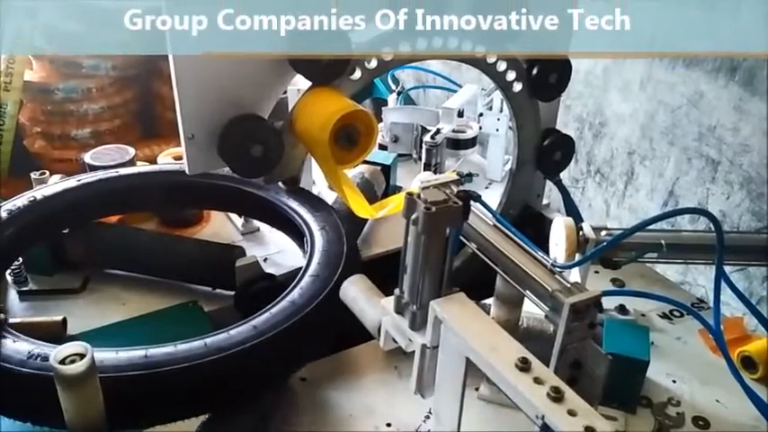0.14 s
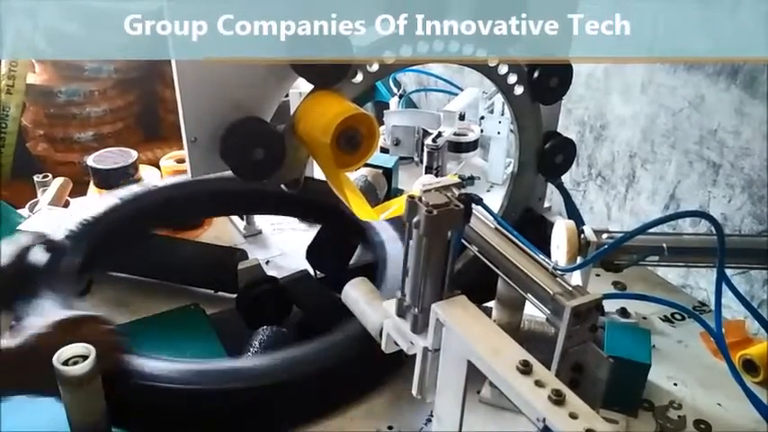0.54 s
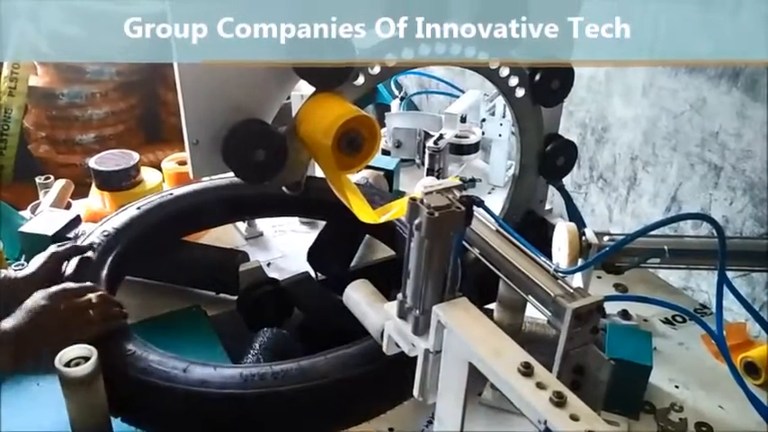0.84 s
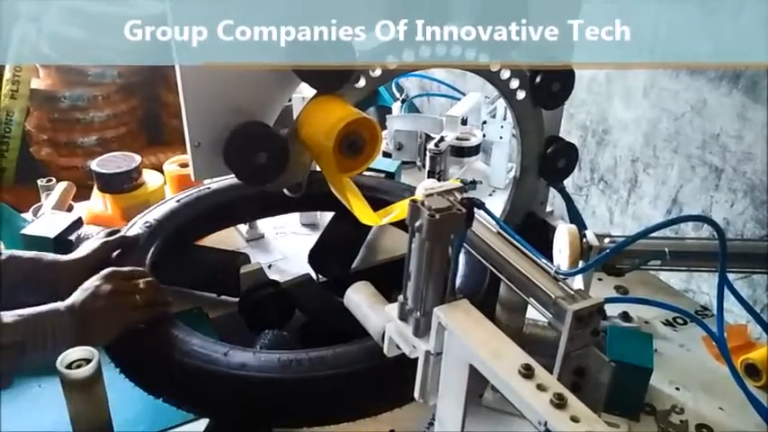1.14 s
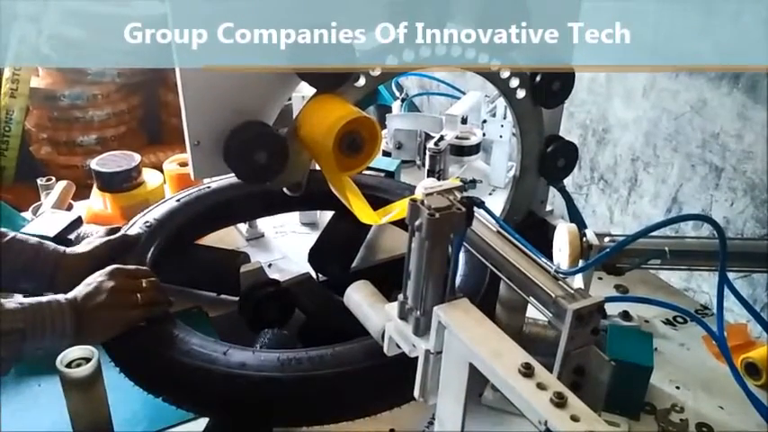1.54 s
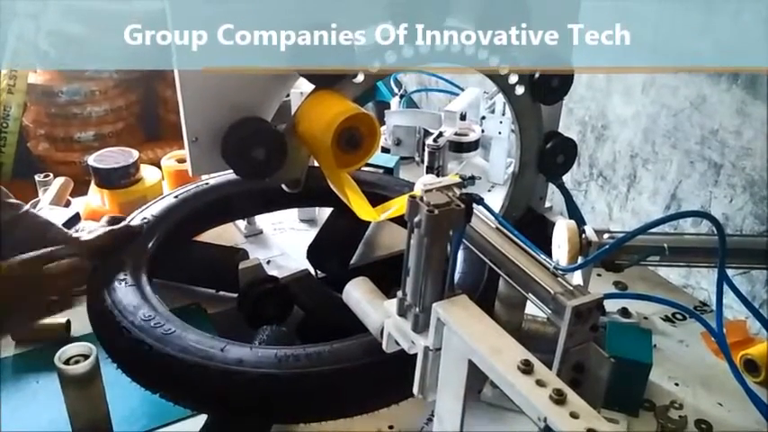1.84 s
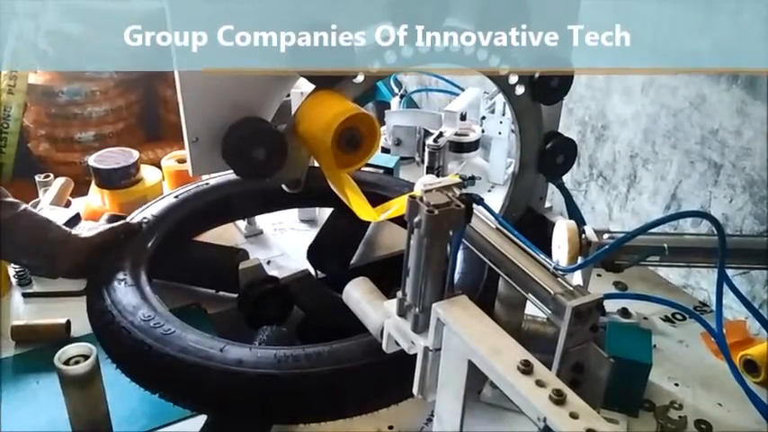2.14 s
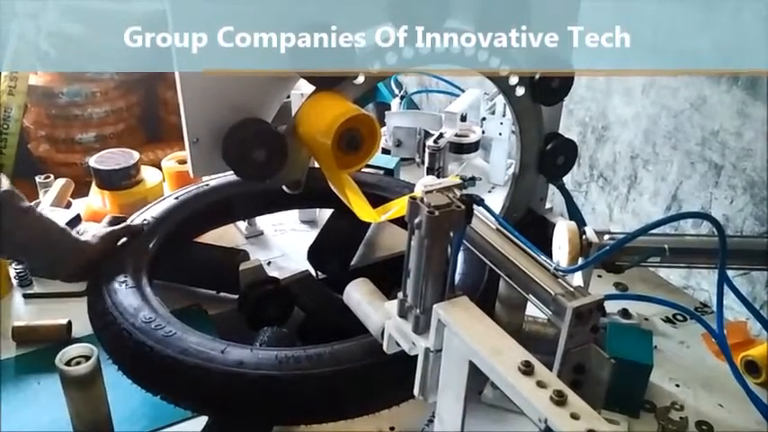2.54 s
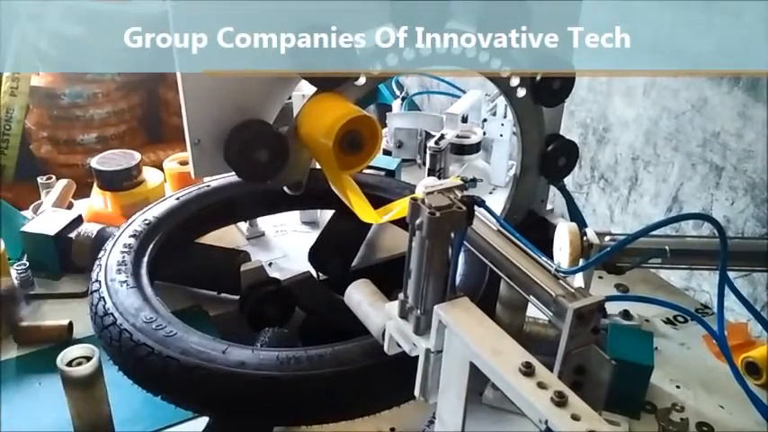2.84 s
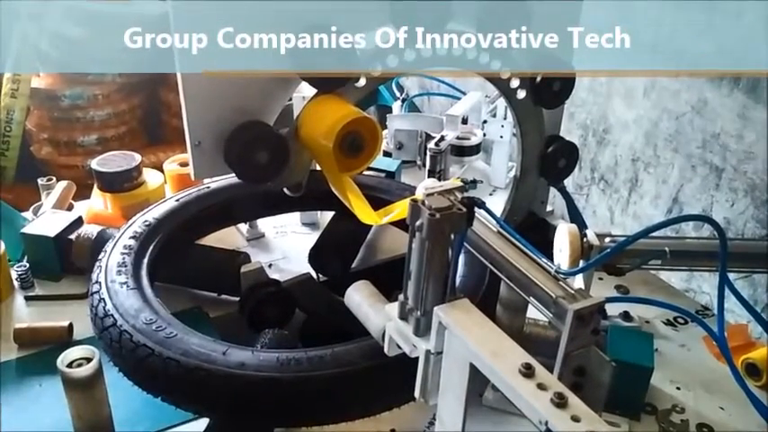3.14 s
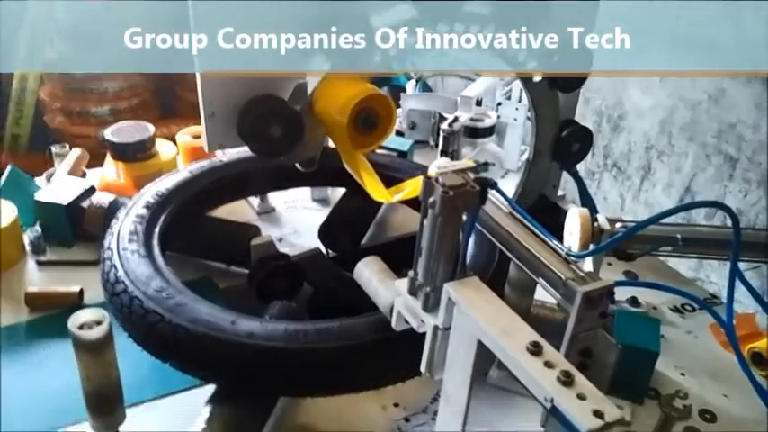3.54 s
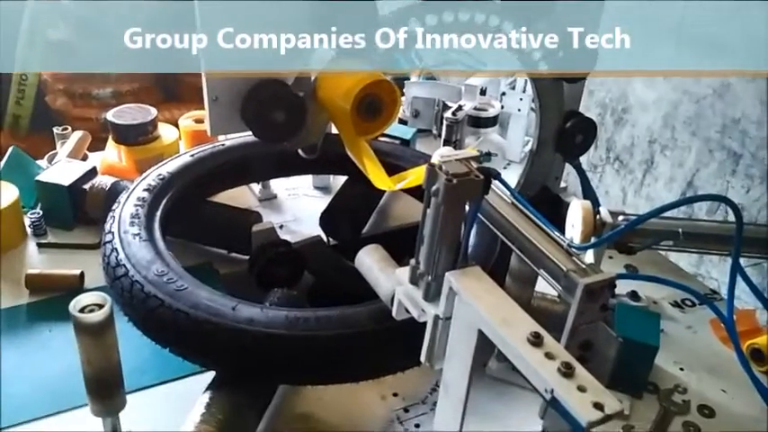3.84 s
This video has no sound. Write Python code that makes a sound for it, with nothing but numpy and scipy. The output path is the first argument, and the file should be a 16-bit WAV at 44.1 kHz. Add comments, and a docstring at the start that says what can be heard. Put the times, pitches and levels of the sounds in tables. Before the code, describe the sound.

Pneumatic clamp vents sharply twice near the end, the second spitting as it opens; before that a tyre slides, groans and knocks with plastic film crackling, machine idling, miked close in a small live workshop.

```python
"""Tyre wrapping in a workshop

A tyre is pushed into a wrapping machine, over the low rumble of the idling drive.
Rubber scuffs, groans and squeaks (shaped noise, unsteady tones); film rustles and ticks (noise strokes).
The pneumatic clamp vents in two short loud hisses of shaped noise, the second with spits at its opening.
"""
import sys
import numpy as np
from scipy import signal
from scipy.fft import rfft, irfft
from scipy.io import wavfile

SR = 44100
rng = np.random.default_rng(int(sys.argv[2]) if len(sys.argv) > 2 else 0)


def dump(signal):
    """Clip the signal to [-1, 1] and save it as 16-bit WAV at the path in sys.argv[1]."""
    limited = np.clip(np.atleast_2d(signal).T, -1, 1)
    pcm = np.round(limited * 32767).astype(np.int16)
    wavfile.write(sys.argv[1], SR, pcm)


N = 176400
T = np.arange(N) / SR
HZ = np.fft.rfftfreq(2 * N, 1 / SR)  # frequencies of a signal padded to double length
SHORT_HZ = HZ[::2]  # frequencies of an unpadded signal
JITTER_HZ = 414  # how fast the pitch of whistles and squeaks wavers

# colours of the two exhaust ports, named in the table of bursts: f/Hz, relative level per Hz/dB
FIRST_PORT = [(40, -43), (400, -19), (530, -24.5), (860, -18.5), (1120, -10.5), (1300, -17.5), (1700, -13),
              (2400, -8.5), (3100, -13), (4400, -15), (5500, -9.5), (6900, -10), (8600, -0.5), (10200, -9),
              (14200, -5.5)]
SECOND_PORT = [(40, -30), (115, -18), (290, -25), (410, -11.5), (640, -31.5), (920, -12.5), (1800, -8.5),
               (2300, -6.5), (2850, -4.5), (3700, -7.5), (4800, -6.5), (5600, -3.5), (7000, -4.5),
               (8500, 2.5), (10200, -4.5), (14200, -0.5)]
# colour of the plastic film: f/Hz, relative level per Hz/dB
FILM = [(500, -53), (2500, -19), (4000, -17), (5300, -10.5), (6500, -9.5), (8100, 2.5), (9000, 0),
        (10200, -6), (13500, -3.5), (15000, -15)]


def amp(db):
    """Turns decibels into a gain."""
    return 10 ** (np.asarray(db) / 20)


def unit(x):
    """Scales to an rms of one."""
    return x / np.sqrt(np.mean(x ** 2) + 1e-20)


def read(points, hz):
    """Reads a table along a log-frequency axis."""
    f, value = np.transpose(points)
    return np.interp(np.log(hz + 1), np.log(f), value)


def low_pass(x, hz):
    """Fades out what lies above hz, without delay."""
    return irfft(rfft(x) / (1 + (SHORT_HZ / hz) ** 4), N)


def wobble(hz):
    """Random up-and-down of rms one, moving mostly slower than hz."""
    return unit(low_pass(rng.standard_normal(N), hz))


def colour(x, points):
    """Gives white noise the spectrum of a table, at unchanged power and with no sound ahead of its cause."""
    log_gain = np.log(unit(amp(read(points, HZ))))
    mirrored = np.r_[log_gain, log_gain[-2:0:-1]]
    phase = -signal.hilbert(mirrored).imag[:N + 1]  # minimum phase
    return irfft(rfft(x, 2 * N) * np.exp(log_gain + 1j * phase))[..., :N]


def pair(x):
    """Makes two unrelated channels alike in the bass, as at two close microphones."""
    # left-right likeness: f/Hz, correlation from 0 to 1
    likeness = [(100, .95), (350, .93), (700, .62), (1200, .35), (8000, 0)]
    a, b = rfft(x, 2 * N)
    same = read(likeness, HZ)
    return irfft(np.array([a, same * a + np.sqrt(1 - same ** 2) * b]))[:, :N]


def noise():
    """White turbulence as the two microphones hear it."""
    return pair(rng.standard_normal((2, N)))


def decay(start, seconds):
    """Sudden rise, then an exponential fall to 1/e in the given seconds."""
    return (T >= start) * np.exp(-np.maximum(T - start, 0) / seconds)


def sine(hz):
    """Tone that follows a changing pitch."""
    return np.sin(2 * np.pi * np.cumsum(hz) / SR)


def bursts():
    """Escaping air is turbulent: each jet opens, swells and shuts, sputtering while its body settles."""
    # air bursts: start t/s, opening time/s, swell time/s, length/s, full level/dB, extra level at opening/dB,
    # extra level of the body at opening/dB, sputter rms/dB, colour of the port
    burst_table = [(2.733, 0.0095, 0.039, 0.07, -14.5, -10, -12, -0.5, FIRST_PORT),
                   (3.785, .004, 0.057, 0.093, -13.5, -7.5, 3.5, 1.46, SECOND_PORT)]
    body_hz, settle_s = 4300, 0.066  # the body is what lies below body_hz
    lump_db, lump_hz = 2.4, 110
    close_db_per_s, sputter_hz = 420, 262
    out = np.zeros((2, N))
    for start, opening, swell, length, db, first_db, body_db, sputter_db, port in burst_table:
        t = T - start
        level = db + first_db * np.clip(1 - t / swell, 0, 1) ** 1.36
        level -= close_db_per_s * np.maximum(t - length, 0)
        level += sputter_db * wobble(sputter_hz)
        opened = np.clip(t / opening, 0, 1)
        jet = colour(noise() * opened * amp(level), port)
        body = low_pass(jet, body_hz)
        body_change = body_db * np.clip(1 - t / settle_s, 0, 1) + lump_db * wobble(lump_hz)
        out += jet - body + body * amp(body_change)
    return out


def valve_spits():
    """Around the second opening the valve spits: a crack, a short leak and a ring each time."""
    # spits of the valve: t/s, level/dB
    spits = [(3.751, -26), (3.7693, -24.5), (3.784, -19), (3.791, -23)]
    # colour of a spit: f/Hz, relative level per Hz/dB
    spit_colour = [(200, -25), (2000, -16.5), (2850, 0.5), (4000, -12.5), (5500, -1), (8200, 2),
                   (10500, -8), (14000, -4)]
    crack_s, leak_db, leak_s = 0.0031, -9.5, 0.023
    ring_hz, ring_db, ring_s = 2980, -3.5, 0.0022
    puffs, ring = np.zeros(N), np.zeros(N)
    for s, db in spits:
        puffs += amp(db) * (decay(s, crack_s) + amp(leak_db) * decay(s, leak_s))
        ring += amp(db + ring_db) * decay(s, ring_s) * np.sin(2 * np.pi * ring_hz * (T - s))
    return colour(noise() * puffs, spit_colour) + ring


def machine_echoes(x):
    """Close metal parts throw back a dense cluster of very early echoes."""
    first_s, fade_s, echo_db = 0.00072, 0.0074, -9
    taps = rng.standard_normal((2, N)) * decay(first_s, fade_s)
    taps = pair(taps / np.linalg.norm(taps[0])) * amp(echo_db)
    echoes = signal.fftconvolve(x, taps, axes=1)[:, :N]
    return (x + echoes) / np.hypot(1, amp(echo_db))


def off_axis(x):
    """The jet reaches the right microphone a moment before the left."""
    lag_s = 0.00029
    left = irfft(rfft(x[0]) * np.exp(-2j * np.pi * SHORT_HZ * lag_s), N)
    return np.array([left, x[1]])


def whistles():
    """Each jet briefly rings the cavities of its port, giving breathy, wavering tones."""
    # whistles: start t/s, length/s, mean f/Hz, peak level/dB
    whistle_table = [(2.755, 0.063, 868, -38.5), (2.757, 0.064, 2400, -42), (3.859, 0.017, 2795, -25),
                     (3.897, 0.017, 2350, -26.5)]
    jitter = 0.051  # rms share of the pitch
    out = np.zeros(N)
    for start, length, hz, db in whistle_table:
        pitch = hz * (1 + jitter * wobble(JITTER_HZ))
        swell = np.sin(np.pi * np.clip((T - start) / length, 0, 1))
        out += amp(db) * swell * sine(pitch)
    return out


def slide():
    """Rubber grips and slips unevenly, driving the hollow tyre and the table."""
    # the sliding tyre: t/s, level of the low scuffing/dB, level of the dry scraping/dB
    strokes = [(0, -52.5, -50), (.4, -59.5, -79), (.465, -61, -62), (.49, -48, -56), (.58, -51, -58.5),
               (.79, -47, -57), (.98, -48.5, -71), (1.115, -56, -64), (1.138, -49.5, -50.5),
               (1.25, -46.5, -69.5), (1.36, -51, -64.5), (1.48, -47, -56), (1.575, -50, -58.5),
               (1.61, -45.5, -52.5), (1.75, -53.5, -57), (1.99, -46, -55), (2.24, -51.5, -62.5),
               (2.29, -48.5, -55.5), (2.69, -51.5, -54.5), (3.1, -58, -59), (3.62, -62.5, -81),
               (3.71, -53.5, -57.5), (3.76, -57, -57)]
    # colour of the scuffing: f/Hz, relative level per Hz/dB
    scuff_colour = [(40, -25.5), (110, -10.5), (240, 1), (300, -0.5), (370, -1.5), (460, -3.5), (600, -3.5),
                    (700, -7.5), (830, 0.5), (1050, -12), (1600, -16.5), (5000, -48.5)]
    # colour of the scraping: f/Hz, relative level per Hz/dB
    scrape_colour = [(400, -15), (1100, -5), (2700, -1), (3400, -9), (4200, -10.5), (5100, -7), (7000, -10),
                     (14000, -30)]
    s, scuff_db, scrape_db = np.transpose(strokes)
    grip = 1.5 * wobble(47.6)  # dB, shared by both layers
    scuff = noise() * amp(np.interp(T, s, scuff_db) + grip)
    scrape = noise() * amp(np.interp(T, s, scrape_db) + grip)
    return colour(scuff, scuff_colour) + colour(scrape, scrape_colour)


def rubs():
    """Where the rubber slips too fast to lock, it rasps in one narrow band."""
    # rubs of tyre and film: start t/s, rise/s, fall to 1/e/s, centre f/Hz, width/Hz, level/dB
    rub_table = [(.69, .09, 0.11, 2150, 380, -49.5), (1.128, .008, .035, 2630, 520, -50),
                 (1.2, 0.043, 0.066, 2200, 170, -56.5), (1.42, .12, 0.094, 4980, 300, -60),
                 (1.69, 0.072, .03, 3180, 800, -55.5), (1.695, 0.012, 0.077, 11870, 2850, -46.5),
                 (2.47, 0.13, 0.092, 2890, 98, -56.5)]
    grip_db, grip_hz = 3, 70
    out = np.zeros((2, N))
    for start, rise, fall, hz, width, db in rub_table:
        band_gain = 1 / (1 + (2 * (SHORT_HZ - hz) / width) ** 4)
        band = unit(irfft(rfft(noise()) * band_gain, N))
        stroke = np.clip((T - start) / rise, 0, 1) * np.exp(-np.maximum(T - start - rise, 0) / fall)
        out += amp(db) * band * stroke
    return out * amp(grip_db * wobble(grip_hz))


def squeaks():
    """On the rollers, stick-slip of the rubber locks briefly onto one unsteady pitch: a squeak or groan."""
    # squeaks and groans: start t/s, length/s, first f/Hz, last f/Hz, rms pitch jitter/Hz, rms level at peak/dB
    squeak_table = [(0.827, 0.032, 1080, 1167, 56, -49), (1.587, 0.028, 225, 254, 10, -40),
                    (1.612, 0.014, 580, 547, 31, -35), (1.665, 0.12, 2500, 2520, 127, -46),
                    (1.716, 0.133, 2540, 2500, 65, -50), (1.934, 0.075, 840, 709, 43, -47.5),
                    (2.02, 0.094, 332, 332.4, 8.7, -38), (2.127, 0.058, 343, 337, 14, -40.5),
                    (2.373, 0.131, 540, 451, 12, -47.5), (0.48, 0.024, 2600, 2410, 83, -52)]
    flutter_db, flutter_hz = 1.5, 91
    out = np.zeros(N)
    jitter = wobble(JITTER_HZ)
    for start, length, first_hz, last_hz, jitter_hz, db in squeak_table:
        u = np.clip((T - start) / length, 0, 1)
        hz = first_hz + (last_hz - first_hz) * u + jitter_hz * jitter
        swell = np.sin(np.pi * u) ** 1.07
        out += amp(db) * np.sqrt(2) * swell * sine(hz)
    return out * amp(flutter_db * wobble(flutter_hz))


def bumps():
    """The tyre knocks the rollers with a low, quickly damped ring."""
    # soft bumps: t/s, f/Hz, level/dB, fall to 1/e/s
    bump_table = [(0.58, 340, -32.5, 0.0046), (0.71, 100, -46.5, 0.052), (0.92, 240, -43.5, 0.041),
                  (0.84, 175, -44, 0.021), (3.806, 126, -45, 0.02)]
    out = np.zeros(N)
    for s, hz, db, ring_s in bump_table:
        out += amp(db) * decay(s, ring_s) * np.sin(2 * np.pi * hz * (T - s))
    return out


def film():
    """Bending film crackles: each stroke is a fine hiss thick with tiny crinkles."""
    # rustling strokes: peak t/s, rise from 1/e/s, fall to 1/e squared/s, level/dB
    rustles = [(0.0, .01, 0.15, -42.5), (.115, 0.04, 0.14, -36.5), (.385, 0.0073, 0.074, -47.5),
               (.505, 0.059, 0.26, -42.5), (.635, 0.032, 0.29, -36.5), (1.14, 0.01, 0.21, -49.5),
               (1.235, 0.047, 0.11, -46.5), (1.93, 0.074, 0.31, -48.5), (2.05, 0.056, 0.23, -44),
               (2.421, 0.058, 0.8, -50), (2.69, 0.071, 0.46, -43), (3.02, 0.091, 0.63, -49),
               (3.43, .022, 0.29, -44)]
    crinkles_per_s, spread_db, crinkle_share = 3500, 2.3, 0.3  # share of the power
    power = np.zeros(N)
    for s, rise, fall, db in rustles:
        stroke = np.where(T < s, np.exp(-((T - s) / rise) ** 2), decay(s, fall / 2))
        power += (amp(db) * stroke) ** 2
    sizes = amp(spread_db * np.minimum(rng.exponential(1, N), 5))
    crinkles = sizes * (rng.random(N) < crinkles_per_s / SR)
    power *= 1 - crinkle_share + crinkle_share * unit(crinkles) ** 2
    return colour(noise() * np.sqrt(power), FILM)


def ticks():
    """Film snaps brightly over duller knocks of varied strength; pulled taut, it cracks sharply twice."""
    # ticks: t/s, level/dB, fall to 1/e/s, level of the low knock/dB
    tick_table = [(.073, -30.5, 0.0081, -62), (.777, -31.5, 0.0021, -32.5), (0.817, -33.5, 0.004, -42),
                  (3.2468, -30, 0.0018, -44), (3.405, -35, 0.005, -43.5), (3.468, -31, 0.0047, -47.5)]
    # colour of the knock: f/Hz, relative level per Hz/dB
    knock_colour = [(150, -5), (500, 2), (1200, -2), (2100, -1), (3700, -9), (5000, -2), (14000, -53)]
    # sharp cracks: t/s, level/dB
    cracks = [(0.569, -25), (0.573, -16)]
    # colour of the cracks: f/Hz, relative level per Hz/dB
    crack_colour = [(3500, -20), (8200, -7.5), (12000, 3), (15000, -5.5)]
    crack_s = 0.0011
    snap = sum(amp(db) * decay(s, length) for s, db, length, _ in tick_table)
    knock = sum(amp(db) * decay(s, length) for s, _, length, db in tick_table)
    crack = sum(amp(db) * decay(s, crack_s) for s, db in cracks)
    out = colour(noise() * snap, FILM)
    out += colour(noise() * knock, knock_colour)
    return out + colour(noise() * crack, crack_colour)


def room(x):
    """A diffuse tail that builds up quickly and dies at its own speed in each band."""
    # dying away of the workshop: f/Hz, time to fall by 60 dB/s
    room_t60 = [(150, .5), (2000, 0.49), (8000, 0.47), (14000, 0.33)]
    # strength of the tail against the sound sent into it: f/Hz, level/dB
    room_wet = [(100, 1), (2000, -0.5), (5000, -1.5), (8500, -5.5), (14000, -12)]
    build_s = 0.0024
    hz, t, z = signal.stft(noise()[:, :SR], SR, nperseg=256)
    t60 = read(room_t60, hz)[:, None]
    shape = amp(-60 * t / t60) * (1 - np.exp(-t / build_s))
    energy = (shape ** 2).sum(1, keepdims=True) * t[1] * SR
    shape *= amp(read(room_wet, hz))[:, None] / np.sqrt(energy)
    tail = signal.istft(z * shape, SR, nperseg=256)[1]
    return signal.fftconvolve(x, tail, axes=1)[:, :N]


def idle():
    """The idling machine: steady rumble with a faint hiss of air, both from one shaped noise."""
    # colour of the machine: f/Hz, relative level per Hz/dB
    idle_colour = [(20, -21), (50, -3), (76, -9), (100, 0.5), (140, -5.5), (350, 1), (660, -7.5), (830, 4),
                   (1050, -16.5), (1700, -15), (2500, -6.5), (3600, -16), (6000, -14), (8200, -4.5),
                   (10200, -9), (14200, -12)]
    return amp(-52.5) * colour(noise(), idle_colour)


def scene():
    """Air, film and tyre sound into the workshop over the idling machine."""
    jet = off_axis(machine_echoes(bursts() + valve_spits()))
    rubber = slide() + rubs()
    tones = squeaks() + bumps() + whistles()
    rustle, snaps = film(), ticks()
    send = jet + amp(-8.5) * rustle + amp(3.0) * snaps + amp(-10) * rubber + amp(-4.0) * tones
    return jet + rustle + snaps + rubber + tones + room(send) + idle()


def record(dry):
    """The right microphone is shaded in the treble; high peaks are rounded off; then the band is limited."""
    # shading of the right side: f/Hz, left minus right level/dB
    shadow = [(500, 0.5), (850, -1.5), (1300, 1), (2400, 9), (3500, 0), (4600, 4), (6000, 8.5),
              (8300, 19.5), (10500, 16.5), (14000, 18)]
    # tilt of both microphones: f/Hz, level/dB
    mic_tilt = [(300, -0.5), (2000, 1)]
    ceiling, cut_hz = 0.84, 14350
    right = amp(-read(shadow, HZ))
    balance = np.sqrt(2 / (1 + right ** 2))  # holds the summed power of the two gains
    gains = np.array([np.ones(N + 1), right]) * balance * amp(read(mic_tilt, HZ))
    heard = irfft(rfft(dry, 2 * N) * gains)[:, :N]
    heard = heard / (1 + (heard / ceiling) ** 8) ** (1 / 8)
    band_limit = signal.firwin(401, cut_hz, window=("kaiser", 8), fs=SR)
    return signal.oaconvolve(heard, band_limit[None], "same")


dry = scene()
out = record(dry)
dump(out)
```